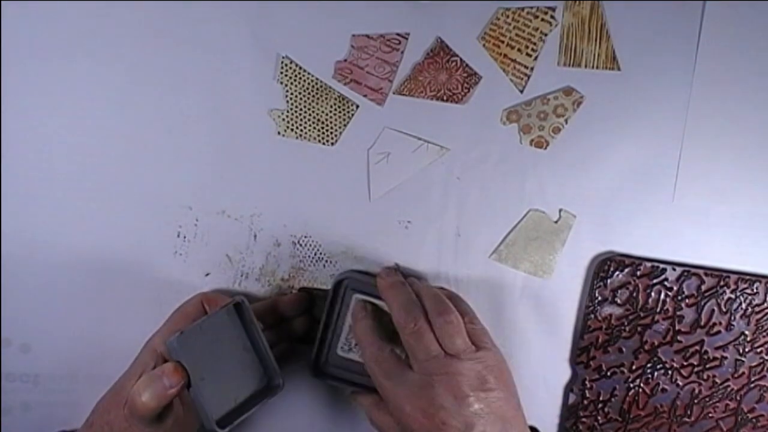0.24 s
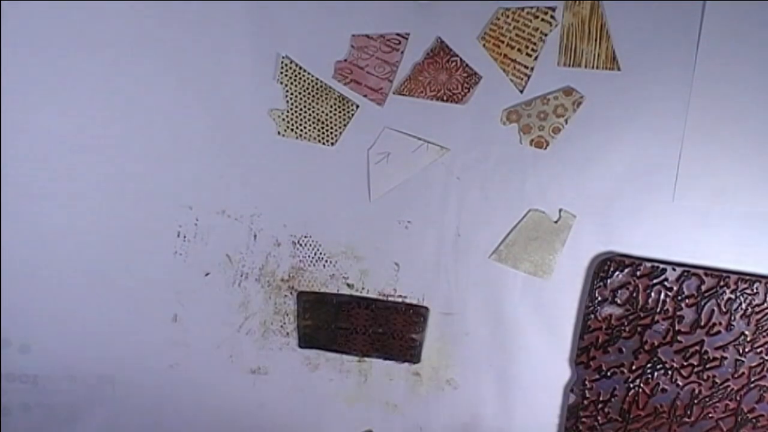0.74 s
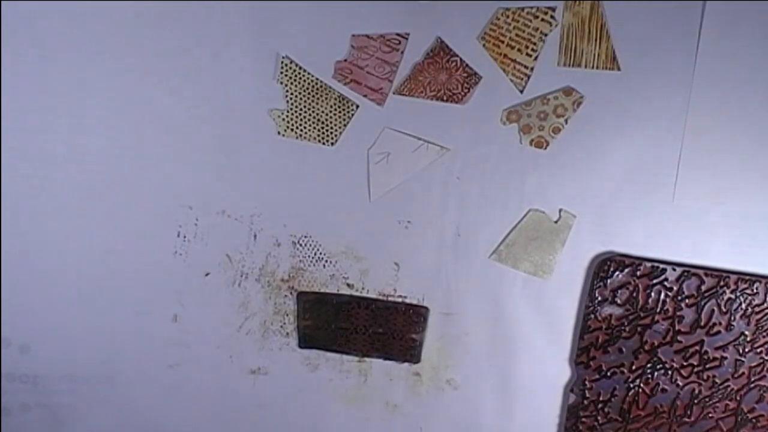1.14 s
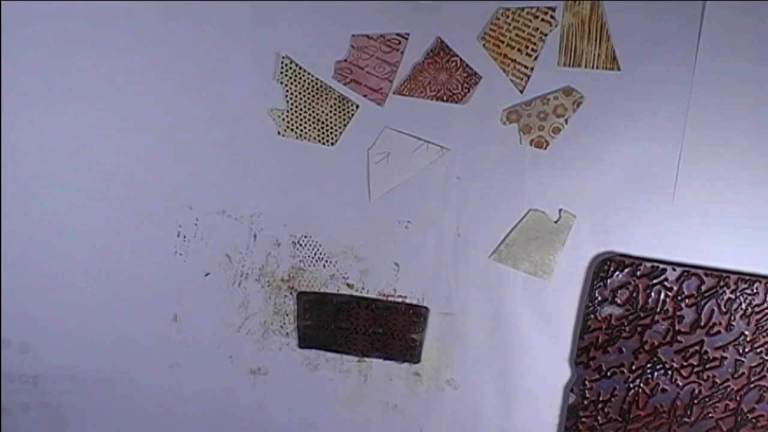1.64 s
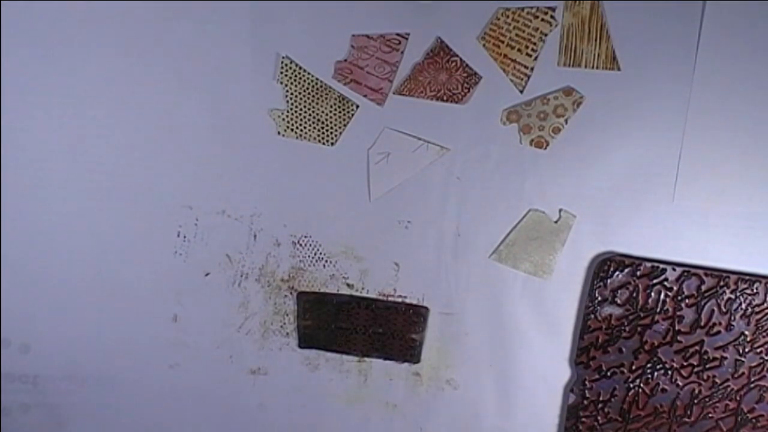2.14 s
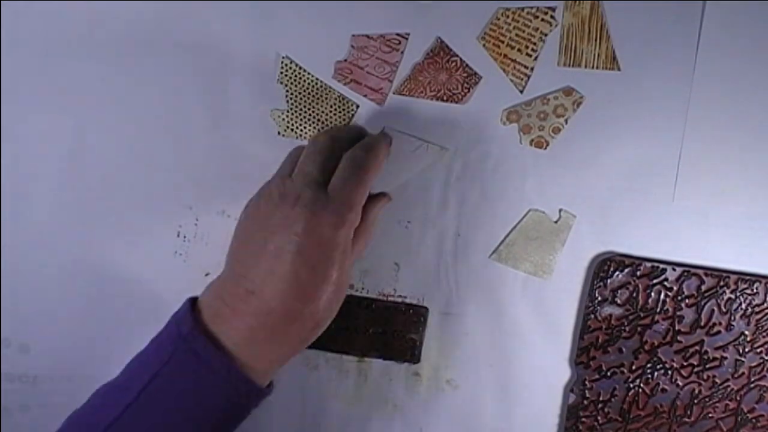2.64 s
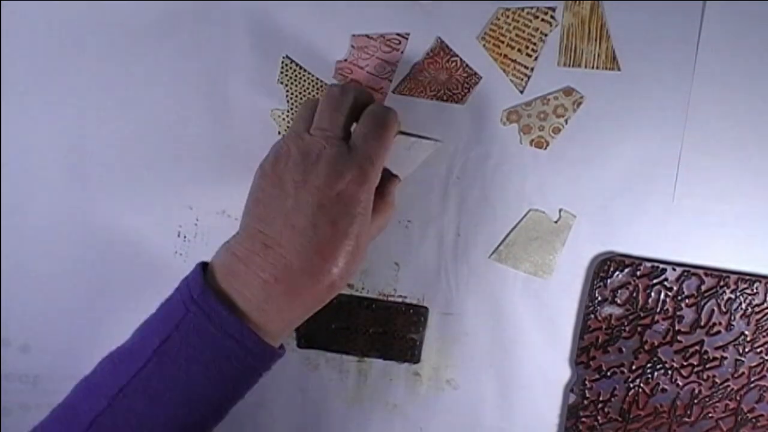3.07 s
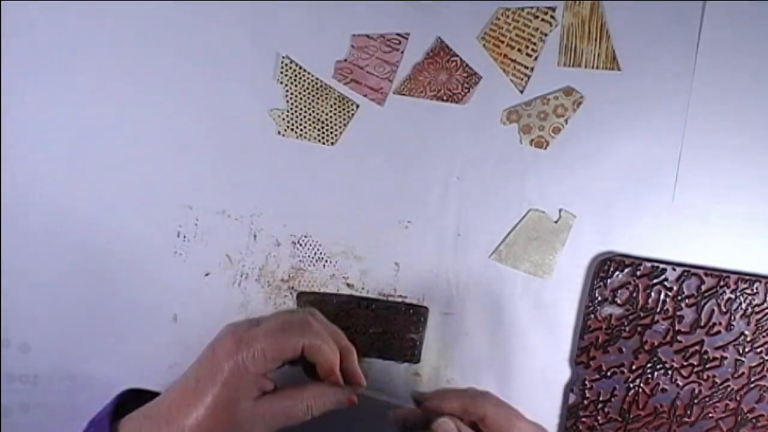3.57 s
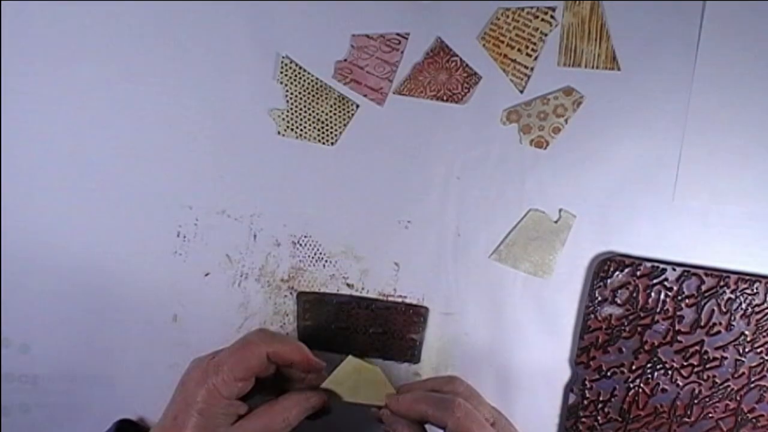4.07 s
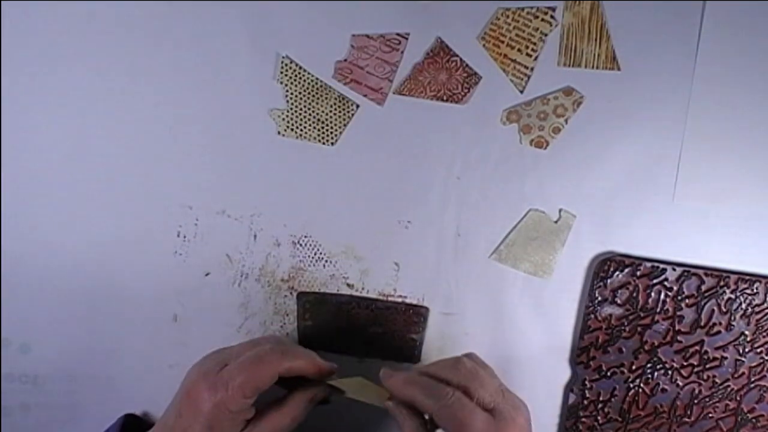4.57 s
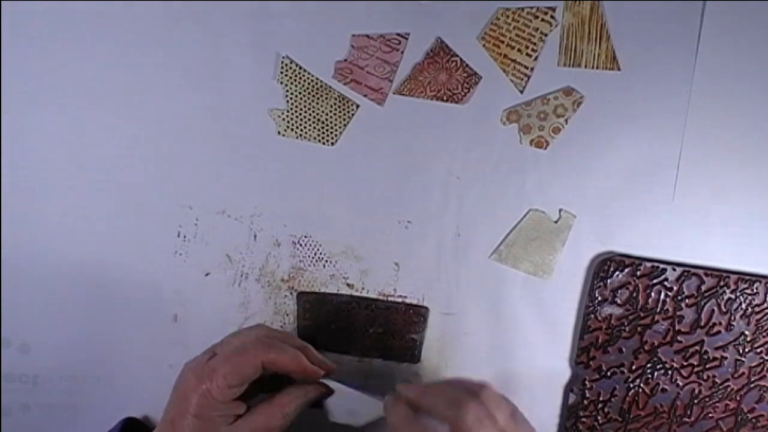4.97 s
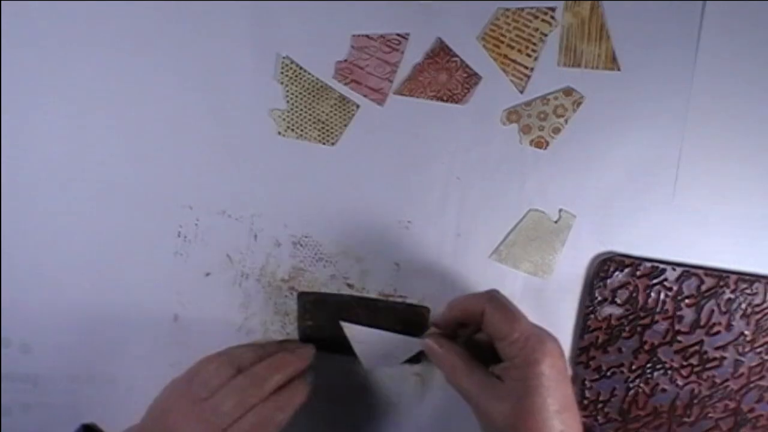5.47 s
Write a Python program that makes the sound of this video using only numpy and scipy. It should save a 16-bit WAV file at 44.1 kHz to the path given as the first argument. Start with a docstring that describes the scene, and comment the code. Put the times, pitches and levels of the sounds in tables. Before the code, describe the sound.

Close up in a small, quiet room, a tabletop thumps under a plastic ink pad. Light lid taps and a short scrape lead to one crisp snap, the loudest sound. After a pause the case knocks down on the table. Soft, grainy paper rubbing and tiny ticks of fingernails and card follow, over faint regular chirping and a thin whistle.

```python
"""Closing an ink pad

A plastic ink pad is dabbed on a craft table, which booms. Its lid taps, scrapes into place and snaps
shut, and the pad is put aside with a knock. Each hit is a push and a scrape that make the object ring.
Then fingers slide over a paper cover with a grainy hiss and handle a scrap of card, which ticks.
The room is small and dry, the microphones close. Faint regular chirps, likely an insect outside,
a trill and a thin whistle come through the quiet."""
import sys
import numpy as np
from scipy import signal
from scipy.fft import rfft, irfft
from scipy.io import wavfile
from scipy.ndimage import uniform_filter1d

SR = 44100
rng = np.random.default_rng(int(sys.argv[2]) if len(sys.argv) > 2 else 0)


def unload_audio(sound):
    """Save the sound as a 16-bit wav file, at the path given as the first command line argument."""
    columns = np.transpose(np.atleast_2d(sound))
    # keep every value between -1 and 1, then stretch to whole-number steps
    steps = np.round(np.clip(columns, -1, 1) * 32767)
    wavfile.write(sys.argv[1], SR, steps.astype(np.int16))


N = 251811
HZ = np.fft.rfftfreq(16384, 1 / SR)  # the pitches at which a hit is shaped


def gain_of(db):
    """Turn decibels into a number to multiply by."""
    return 10 ** (np.asarray(db) / 20)


def unit_power(x):
    """Scale a signal to an average power of one."""
    return x / np.sqrt(np.mean(x ** 2) + 1e-20)


def curve_at(points, hz):
    """Read between a table's points, with every octave equally wide."""
    pitches, values = np.transpose(points)
    return np.interp(np.log(hz + 1), np.log(pitches + 1), values)


def add(mix, start_s, sound):
    """Mix a sound in at its start time."""
    part = mix[round(start_s * SR):][:len(sound)]
    part += sound[:len(part)]


# How alike noise is at the two microphones: pitch_hz, likeness (1 the same, -1 opposite)
LIKENESS = [(60, -0.6), (180, -0.74), (550, -0.7), (1650, 0.014), (5000, 0.66), (15000, 0.25)]
def noise_pair(size):
    """Left and right noise, cut into short slices and split by pitch."""
    slices, hz = N // (size // 4) + 5, np.fft.rfftfreq(size, 1 / SR)
    a, b, c, d = rng.standard_normal((4, slices, len(hz)))
    same = np.clip(curve_at(LIKENESS, hz), -1, 1)
    left = a + 1j * b
    right = same * left + np.sqrt(1 - same ** 2) * (c + 1j * d)
    return np.arange(slices) * (size // 4) / SR, hz, np.array([left, right])


def to_sound(slices):
    """Join the slices into a left and right sound."""
    size = 2 * slices.shape[2] - 2
    return signal.istft(slices.transpose(0, 2, 1), nperseg=size, noverlap=size - size // 4)[1][:, :N]


# The tone of the still room: pitch_hz, relative_db
HUSH_TONE = [(20, -14.5), (100, 1), (150, -2.5), (270, 1), (400, -3.5), (760, -6.5), (1100, -12),
             (2300, -16.5), (3000, -19), (5000, -24), (7500, -26.5), (10500, -31), (13000, -36.5),
             (16000, -34.5)]
def hush(level_db=-55.5):
    """The room's steady, low background noise."""
    _, hz, noise = noise_pair(2048)
    return gain_of(level_db) * unit_power(to_sound(noise * gain_of(curve_at(HUSH_TONE, hz))))


def fuzzy_tone(t, pitch_hz, width_hz):
    """Noise kept close to one pitch sounds like a wavering tone."""
    hz = np.fft.rfftfreq(len(t), 1 / SR)
    band = rfft(rng.standard_normal(len(t))) / (1 + ((hz - pitch_hz) / width_hz) ** 4)
    return unit_power(irfft(band, len(t)))


# When the whistle sounds: start_s, length_s, level_db
WHISTLE_TIMES = [(0.698, 1.65, -71), (4.599, 1.035, -62)]
def whistle():
    """A faint, unsteady high tone with a weaker one above it."""
    out = np.zeros(N)
    for start_s, length_s, db in WHISTLE_TIMES:
        t = np.arange(int(length_s * SR)) / SR
        tone = fuzzy_tone(t, 2034, width_hz=70) + gain_of(-12) * fuzzy_tone(t, 3460, width_hz=140)
        add(out, start_s, gain_of(db) * tone * signal.windows.tukey(len(t), .25))
    return out


def insect(first_s=.412, every_s=.478, length_s=.103, pitch_hz=2560, throb_hz=33):
    """Short, throbbing chirps with a shrill edge come at an even pace."""
    out = np.zeros(N)
    t = np.arange(int(length_s * SR)) / SR
    throb = 1 - .5 * np.cos(2 * np.pi * throb_hz * t)
    for start_s in np.arange(first_s, N / SR, every_s):
        hz = pitch_hz * (1 + .011 * rng.standard_normal())
        call = fuzzy_tone(t, hz, width_hz=230) + gain_of(-9) * fuzzy_tone(t, hz * 3.25, width_hz=900)
        db = -62.5 - 13 * np.exp(-((start_s - 2.47) / .54) ** 2)  # fainter for a while midway
        add(out, start_s, gain_of(db) * call * throb * signal.windows.tukey(len(t), .4))
    return out


def trill(start_s=2.75, length_s=2.6, pulse_hz=22):
    """One thin, very faint tone pulses quickly."""
    out = np.zeros(N)
    t = np.arange(int(length_s * SR)) / SR
    tone = fuzzy_tone(t, 4800, width_hz=100) * (1 - np.cos(2 * np.pi * pulse_hz * t))
    add(out, start_s, gain_of(-78) * tone * signal.windows.tukey(len(t), .1))
    return out


# The tone of rubbed paper: pitch_hz, relative_db
PAPER_TONE = [(200, -9), (700, -1), (1600, 0), (2400, -2), (3400, 3), (4600, -3), (7000, -4), (9500, -8),
              (11500, -17), (13500, -21), (16000, -33)]
def paper_tone(hz, tilt_db):
    """The hiss of paper, tilted brighter or duller at the same power."""
    octaves = np.log2(np.clip(hz, 500, 9000))
    tone = gain_of(curve_at(PAPER_TONE, hz) + np.outer(tilt_db, octaves))
    return tone / np.sqrt(np.mean(tone ** 2, axis=1, keepdims=True))


# Single finger swipes over paper: middle_s, half_length_s, level_db, tilt_db_per_octave
FINGER_SWIPES = [(0.271, 0.018, -50.5, -5.5), (.592, 0.019, -54.5, -3.5), (.85, 0.01, -53.5, -0.5),
                 (2.594, 0.028, -57, -3.5), (2.777, 0.024, -51, -1), (2.882, 0.0086, -55, -2.5),
                 (3.04, .016, -56, 1.5), (3.163, .035, -54.5, 5.5), (3.247, 0.025, -55, 1.5),
                 (3.595, 0.031, -58, -2.5), (3.789, 0.047, -58, 4), (4.598, 0.016, -55.5, -5),
                 (5.356, .08, -60.5, 6)]
# Steady rubbing as the pad is carried, then the card handled: time_s, relative_db, tilt_db_per_octave
PAD_CARRYING = [(1.5, -63.5, -2.5), (1.754, -63, -2.5), (1.866, -69, -1), (2.05, -92, -18)]
CARD_HANDLING = [(3.35, -77.5, 4), (3.75, -67, 0), (3.98, -75, 9), (4.17, -96, -4), (4.38, -65, 1.5),
                 (4.54, -80, -3), (4.73, -62, -5.5), (4.95, -61, -1.5), (5.15, -60, -4.5),
                 (5.6, -62.5, -1.5), (5.7, -70.5, -1)]
def rubbing(fade_s=.048, patchy_db=2, grain_db=1.8):
    """Skin and card drag over paper fibres and make a grainy hiss that swells with each swipe."""
    t, hz, noise = noise_pair(256)
    power = 0
    for middle_s, half_s, db, tilt_db in FINGER_SWIPES:
        swell = gain_of(db) * np.exp(-((t - middle_s) / half_s) ** 2 / 2)
        power = power + (swell[:, None] * paper_tone(hz, tilt_db)) ** 2
    for rub in (PAD_CARRYING, CARD_HANDLING):
        times, db, tilt_db = np.transpose(rub)
        outside_s = t - np.clip(t, times[0], times[-1])
        level = gain_of(np.interp(t, times, db) + 1) * np.exp(-(outside_s / fade_s) ** 2)
        power = power + (level[:, None] * paper_tone(hz, np.interp(t, times, tilt_db))) ** 2
    patches = uniform_filter1d(rng.standard_normal(power.shape), size=16, axis=0)  # smooth in time
    patches = unit_power(uniform_filter1d(patches, size=4, axis=1))  # and in pitch
    fibres = unit_power(uniform_filter1d(rng.standard_normal(N), size=60))
    hiss = to_sound(noise * np.sqrt(power) * gain_of(patchy_db * patches)) / to_sound(noise).std()
    return hiss * gain_of(grain_db * fibres)


# How long the room's echo takes to fade by 60 dB: pitch_hz, fade_s
ECHO_FADE = [(100, 0.1), (400, 0.17), (1500, .21), (5000, 0.21), (12000, 0.15)]
# The tone of the echo: pitch_hz, relative_db
ECHO_TONE = [(60, -27), (200, -4), (550, 3.5), (1500, -1.5), (2500, -6), (4500, -1.5), (8000, 0),
             (11000, 2), (15000, -12.5)]
# How unlike the echo is on the left and right: pitch_hz, side_share
ECHO_WIDTH = [(100, .3), (400, .2), (1200, .12), (3000, .18), (6000, .35), (10000, .7)]
def room(direct, sent, echo_db, pan_db=0, spread=1, build_s=.0017):
    """Sound reaches two microphones directly, then as a short wash of echoes."""
    hz, t, noise = signal.stft(rng.standard_normal((2, SR // 2)), SR, nperseg=256)
    noise *= gain_of(curve_at(ECHO_TONE, hz)[:, None] - 60 * t / curve_at(ECHO_FADE, hz)[:, None])
    noise[1] *= spread * curve_at(ECHO_WIDTH, hz)[:, None]
    mid, side = signal.istft(noise, SR, nperseg=256)[1]
    build_up = 1 - np.exp(-(np.arange(len(mid)) / SR / build_s) ** 2)
    tail = np.array([mid + side, mid - side]) * build_up
    echo = signal.fftconvolve(sent[None], tail / np.linalg.norm(tail[0]), axes=1)[:, :N]
    lead = .32 * np.gradient(direct)  # one microphone hears it a tiny bit sooner
    pair = np.array([direct - lead, direct + lead]) + gain_of(echo_db) * echo
    return pair * gain_of([[pan_db / 2], [-pan_db / 2]])


def tone_filter(gain):
    """A filter of this shape that never rings before the hit."""
    log_gain = np.log(np.maximum(gain / gain.max(), 1e-4))
    mirrored = np.r_[log_gain, log_gain[-2:0:-1]]
    return np.exp(np.conj(signal.hilbert(mirrored)))[:len(gain)]


def ringing(notes):
    """A struck object rings at its own notes, each fading by 60 dB in fade_s."""
    delay = np.exp(-2j * np.pi * HZ / SR)
    out = 0
    for k, (hz, db, fade_s) in enumerate(notes):
        decay = np.exp(-np.log(1000) / (fade_s * SR))
        feedback = 1 - 2 * decay * np.cos(2 * np.pi * hz / SR) * delay + (decay * delay) ** 2
        direction = (-1) ** k  # neighbouring notes swing opposite ways
        out = out + direction * gain_of(db) * (1 - decay) * (1 - delay ** 2) / feedback
    return out


def hits(rows, notes, grit, clack, clack_s):
    """A push and a scrape ring an object's main notes and a clack of many lesser ones."""
    direct, sent, response = np.zeros(N), np.zeros(N), ringing(notes)
    t = np.arange(2 * len(HZ) - 2) / SR
    hz, note_db, _ = np.transpose(notes)
    outline = gain_of(curve_at(np.c_[hz, note_db], HZ))  # the object's overall tone
    roll_off = np.hypot(1, (hz[0] / (HZ + 1)) ** 2) * np.hypot(1, (HZ / hz[-1]) ** 4)
    outline = tone_filter(outline / roll_off)
    for start_s, db, hardness_hz, bass_db, scrape_s in rows:
        slips, lesser = rng.standard_normal((2, len(t)))
        slips = slips * abs(slips) * np.exp(-t / max(scrape_s, 1 / SR))
        force = grit * scrape_s / .00069 * slips / np.linalg.norm(slips)
        force[0] += 1  # the first push, which a long scrape outweighs
        bass = 1 + (gain_of(bass_db) - 1) / (1 + (HZ / 800) ** 4)
        contact = rfft(force) * tone_filter(bass / np.hypot(1, HZ / hardness_hz))  # softer is duller
        shapes = response, outline * rfft(lesser * np.exp(-t / clack_s)), outline
        ring, dense, smooth = (unit_power(irfft(contact * shape)[:len(t) // 2]) for shape in shapes)
        size = gain_of(db) * np.sqrt(SR / 100 / len(ring))  # level as if packed into 10 ms
        add(direct, start_s, size * unit_power(ring + clack * dense))
        add(sent, start_s, size * unit_power(smooth + .13 * ring))  # feeds the room's echo
    return direct, sent


# Fingernails and card edges ticking: start_s, level_db, hardness_hz, bass_db
CARD_TICKS = [(0.4437, -56, 7000, 0), (1.556, -49, 6000, 12.5), (2.156, -55, 12000, -6),
              (2.674, -52, 2570, -6), (2.7752, -48, 3020, -9), (3.823, -52.5, 9000, 4),
              (4.412, -56, 8770, -6), (4.483, -52, 2370, 3), (4.6855, -48.5, 13000, 9.5),
              (4.874, -46.5, 7960, -11), (4.999, -48, 7000, -12), (5.09, -56, 8000, -15),
              (5.1723, -50.5, 1200, 7)]
# The card's notes: pitch_hz, relative_db, fade_s
CARD_NOTES = [(332, -5.5, 0.039), (603, -2.5, 0.099), (970, -0.5, 0.03), (1360, -2.5, 0.01),
              (2005, 4.5, 0.011), (2900, -0.5, 0.04), (3460, 2.5, 0.028), (5200, -1.5, 0.0047),
              (6600, 0, 0.0082), (9050, -5.5, 0.001), (12000, -10, 0.0023)]
def card_ticks(stray_count=4, scrape_s=.0035):
    """Nails and edges make tiny scrapes; fainter ones fall at random as the card is handled."""
    strays = [(start_s, -55, 6020, -12) for start_s in rng.uniform(3.8, 5.8, stray_count)]
    rows = [(*row, scrape_s) for row in CARD_TICKS + strays]
    return room(*hits(rows, CARD_NOTES, grit=4.1, clack=.77, clack_s=.011), echo_db=-5)


# The table top's low notes: pitch_hz, relative_db, fade_s
TABLE_NOTES = [(60, -8, 0.62), (108, 3, 0.36), (150.4, 9, 0.108), (178, -1, 0.084), (247, -18, 0.26),
               (326, -17, 0.28)]
def table_boom():
    """The table top gives under the pad and booms, at the dab and when the pad is put aside."""
    t = np.arange(SR // 2) / SR
    ring = sum(gain_of(db - 60 * t / fade_s) * np.sin(2 * np.pi * hz * t)
               for hz, db, fade_s in TABLE_NOTES)
    boom = np.zeros(N)
    for start_s, db in ((.1645, -29.5), (2.376, -41)):
        add(boom, start_s, -gain_of(db) * ring / abs(ring).max())
    return room(boom, boom, echo_db=9, spread=2.9)


# The pad meeting the table: start_s, level_db, hardness_hz, bass_db, scrape_s
PAD_DABS = [(.1611, -35.5, 9000, 0, 0.0012)]
# The pad's notes: pitch_hz, relative_db, fade_s
PAD_NOTES = [(590, 2, 0.016), (870, -1.5, 0.021), (996, 2, 0.019), (1600, -0.5, 0.022), (1940, 1, 0.016),
             (3040, -4, 0.014), (4070, -3.5, 0.02), (4870, -15, .01), (5360, -18, 0.013),
             (8100, -23, 0.0065)]
def pad_dab():
    """The plastic pad rings briefly as it touches the table."""
    return room(*hits(PAD_DABS, PAD_NOTES, grit=1, clack=.44, clack_s=.002), echo_db=-12.5)


# The pad landing, edge after edge: start_s, level_db, hardness_hz, scrape_s
PAD_KNOCKS = [(2.2027, -34, 1200, 0.002), (2.281, -27.5, 6900, 0.001), (2.3726, -17.5, 8500, 0.000057)]
# The pad dragging between knocks: start_s, level_db, scrape_s
PAD_DRAGS = [(2.249, -34, 0.023), (2.32, -37, 0.09)]
# The notes of the surface it lands on: pitch_hz, relative_db, fade_s
SURFACE_NOTES = [(206, 0, 0.16), (228.4, 10.5, 0.2), (280, 0.5, 0.14), (339, 6, 0.15), (448, -10, 0.12),
                 (546, 3.5, 0.24), (606, -4, 0.12), (802, -1, 0.093), (960, 3, 0.12), (1143, -2, 0.071),
                 (1290, -1.5, 0.23), (1824, 5.5, 0.056), (1840, 2.5, 0.058), (2390, -1, 0.089),
                 (2700, 4, 0.05), (3280, 2.5, 0.07), (3700, -2.5, 0.036), (4270, -4.5, 0.02),
                 (5330, -8.5, 0.028), (6400, -13.5, 0.023), (7340, -12, 0.017), (11700, -22, 0.018)]
def pad_put_aside(knock_bass_db=4.5, drag_bass_db=6.5, drag_hardness_hz=650):
    """The pad lands on its edges, drags dully in between and drops flat."""
    knocks = [(s, db, hz, knock_bass_db, scrape_s) for s, db, hz, scrape_s in PAD_KNOCKS]
    drags = [(s, db, drag_hardness_hz, drag_bass_db, scrape_s) for s, db, scrape_s in PAD_DRAGS]
    landing = hits(knocks + drags, SURFACE_NOTES, grit=.6, clack=.93, clack_s=.015)
    return room(*landing, echo_db=-5.5, pan_db=1.5, spread=1.77)


# The lid touching the case: start_s, level_db, hardness_hz
LID_TOUCHES = [(0.055, -55, 1500), (.387, -61, 1800), (0.7191, -49.5, 9000), (0.7367, -34.5, 3750),
               (0.7592, -37.5, 2300), (0.8623, -37.5, 1870), (0.9874, -27.5, 2508), (.992, -21.5, 6040),
               (1.007, -33, 1811), (1.1285, -52, 2459), (1.239, -45, 3840), (1.2499, -31.5, 4970)]
# The lid's notes: pitch_hz, relative_db, fade_s
LID_NOTES = [(647, -17, 0.022), (820, -9, 0.031), (1290, -7, 0.037), (1470, 0, .04), (1634, 1.5, .05),
             (1862, -3, .03), (2573, -8.5, 0.045), (2868, -13, .03), (3414, -9.5, 0.023),
             (3350, -1.5, 0.038), (4029, -9, 0.031), (4630, -13.5, 0.009), (5660, -14.5, .02),
             (6050, -17.5, 0.03), (7700, -18.5, 0.0116), (9700, -26, .006)]
def lid_taps(firm_db=-27.5, firm_scrape_s=.0008, doubling_db=13, bass_db=.5):
    """The lid taps the case: the lighter the touch, the longer it scrapes."""
    rows = [(start_s, db, hardness_hz, bass_db, firm_scrape_s * 2 ** ((firm_db - db) / doubling_db))
            for start_s, db, hardness_hz in LID_TOUCHES]
    return room(*hits(rows, LID_NOTES, grit=.17, clack=.47, clack_s=.013), echo_db=-11.5, pan_db=.5)


# The lid's rim slipping: start_s, level_db, hardness_hz, bass_db, scrape_s
RIM_SCRAPES = [(1.0143, -31.5, 14080, -3, 0.0026), (1.0165, -19.5, 8870, 0, 0.00096),
               (1.0228, -34, 2000, 4, 0.0017)]
# The rim's notes: pitch_hz, relative_db, fade_s
RIM_NOTES = [(179.4, -18, 0.017), (282, -11.5, .03), (603, -8.5, .025), (915, -7, 0.065), (1250, -9, 0.045),
             (1650, -2, 0.02), (1920, -3, .025), (2820, 4, .028), (3614, 0, 0.0094), (4170, -6.5, 0.0085),
             (4980, -5.5, 0.02), (5440, -4.5, 0.026), (6540, -5.5, .03), (7400, -10, 0.011),
             (8380, -12, .016), (9260, -9.5, 0.018), (10900, -14.5, 0.0058)]
def rim_scrape():
    """The rim scrapes down into its seat in three quick slips."""
    slips = hits(RIM_SCRAPES, RIM_NOTES, grit=1.1, clack=.91, clack_s=.0055)
    return room(*slips, echo_db=-11, pan_db=.8)


# The catch closing: start_s, level_db, hardness_hz, bass_db, scrape_s
CATCH_CLICKS = [(1.258, -21.5, 2537, 1, .0003), (1.2597, -9.5, 6990, -1, .0003)]
# The shut case's notes, damped by the palm: pitch_hz, relative_db, fade_s
CASE_NOTES = [(60, -11.5, 0.012), (172, -6.5, 0.0075), (300, -1.5, 0.0098), (600, -4, 0.014),
              (853, -0.5, 0.01964), (1030, -4.5, 0.017), (1300, -2, 0.0083), (1620, -0.5, .012),
              (1820, -1.5, 0.06), (3034, -7, 0.003), (3570, -7, 0.0025), (4480, -1, 0.039),
              (4770, -5.5, .008), (5823, -0.5, 0.004), (6720, -4, 0.014), (7864, -11.5, 0.0054),
              (10000, -13, 0.002)]
def lid_snap():
    """The catch snaps home with two clicks so close that they sound like one."""
    clicks = hits(CATCH_CLICKS, CASE_NOTES, grit=.6, clack=.67, clack_s=.002)
    return room(*clicks, echo_db=-14.5, pan_db=1)


def scene():
    """The ink pad and the card handling, over the quiet room."""
    background = hush() + whistle() + insect() + trill()
    handling = rubbing() + card_ticks()
    ink_pad = table_boom() + pad_dab() + pad_put_aside() + lid_taps() + rim_scrape() + lid_snap()
    return background + handling + ink_pad


# How the microphones pick up high sounds: pitch_hz, gain_db
MICROPHONE_TONE = [(9000, -1), (11000, 0), (12500, -4), (16000, -8.5)]
def record(dry):
    """The microphones soften the top octave, too-loud peaks are clipped and the very top is cut."""
    tone = gain_of(curve_at(MICROPHONE_TONE, np.fft.rfftfreq(N, 1 / SR)))
    clipped = np.clip(irfft(rfft(dry) * tone, N), -1, 1)
    top_cut = signal.firwin(255, 15900, window=("kaiser", 7), fs=SR)
    return signal.oaconvolve(clipped, top_cut[None], "same")


dry = scene()
out = record(dry)
unload_audio(out)
```